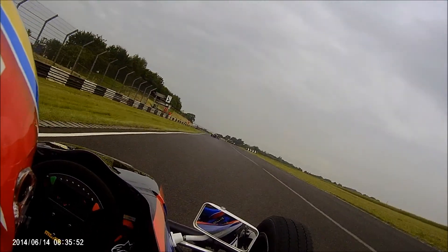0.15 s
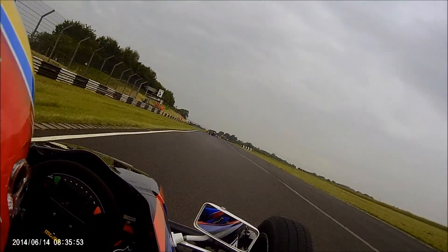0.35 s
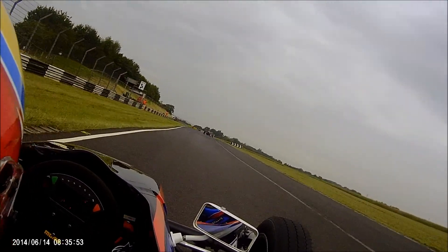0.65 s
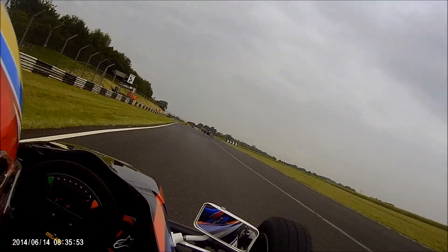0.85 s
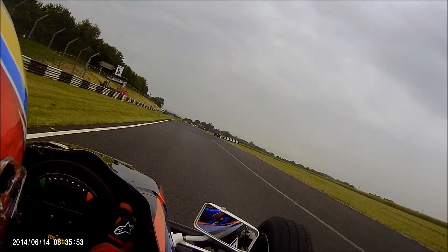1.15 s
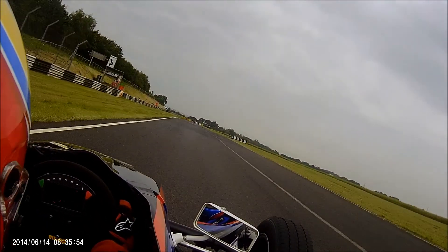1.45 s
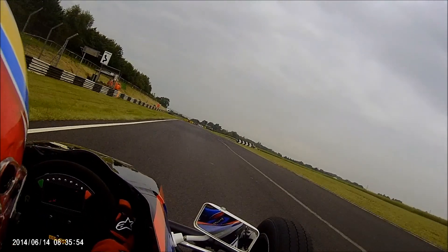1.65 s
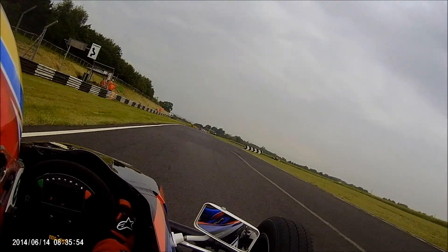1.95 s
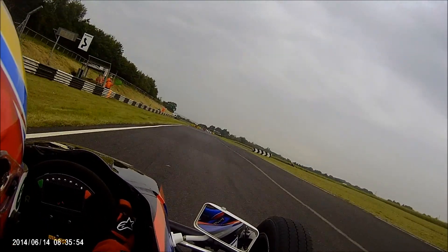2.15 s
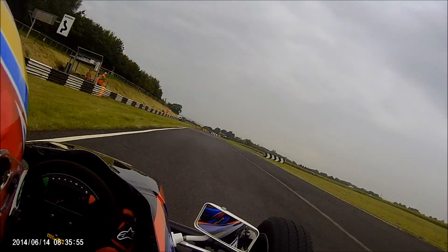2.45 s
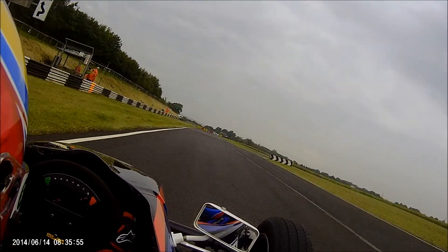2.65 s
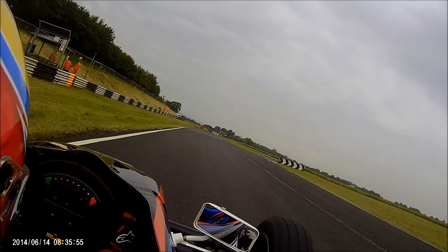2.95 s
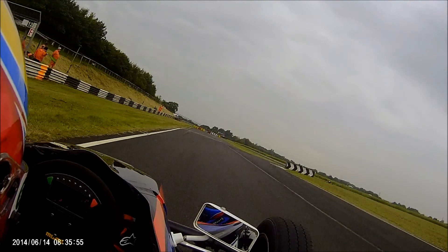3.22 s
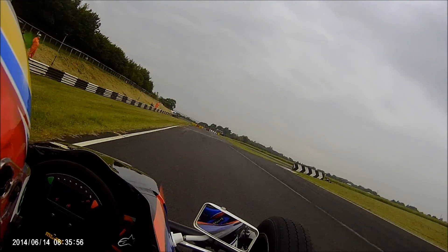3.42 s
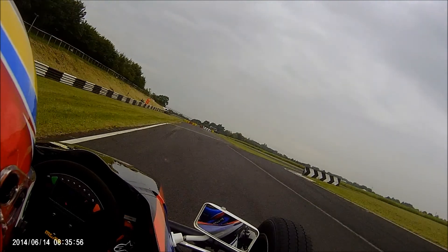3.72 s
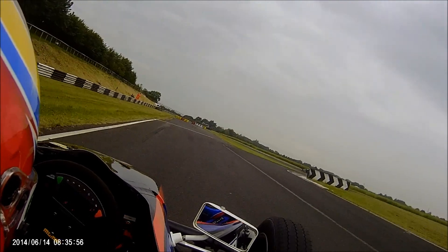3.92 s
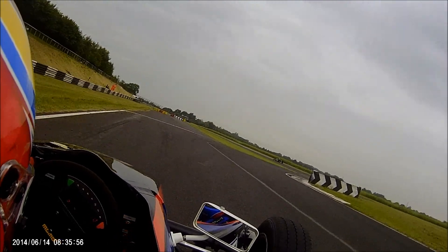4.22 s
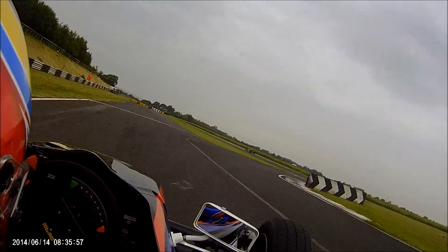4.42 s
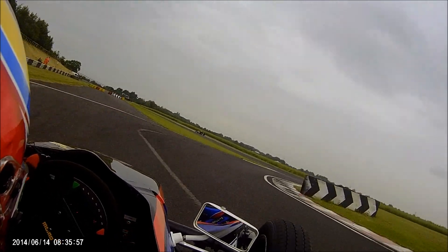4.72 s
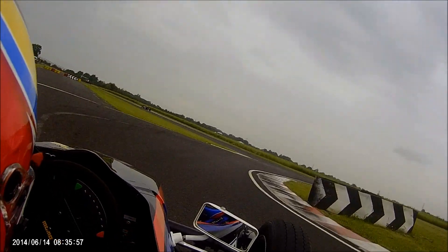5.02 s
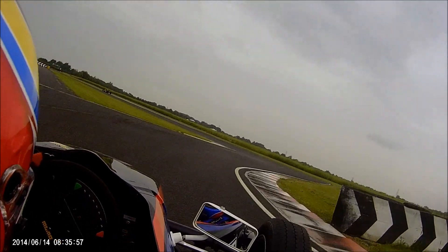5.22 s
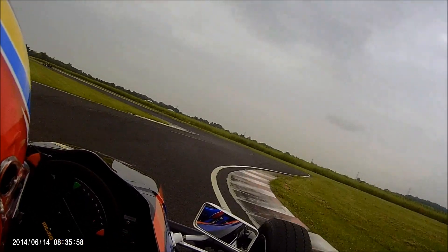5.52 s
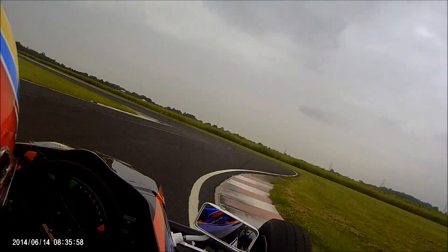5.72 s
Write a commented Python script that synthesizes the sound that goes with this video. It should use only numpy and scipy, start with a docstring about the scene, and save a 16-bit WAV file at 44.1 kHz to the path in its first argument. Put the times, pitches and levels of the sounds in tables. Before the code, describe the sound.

A small race car's air-cooled engine drones and clatters close by, its revs sinking steadily into a corner, then just starting to rise.

```python
"""An air-cooled four-cylinder engine on board a small open-wheel race car, close by the driver's helmet.
The revs sink on the way into a corner and just begin to pick up at the apex.
Engine orders are sine waves that swell and fade as they slide through the resonances of the bodywork.
Each firing thumps the frame and makes a loose part tick, both as filtered impulses.
Filtered noise makes the rattle, the metallic clatter, the rush of air and tyres and the road rumble."""
import sys
import numpy as np
from scipy import signal
from scipy.fft import rfft, irfft
from scipy.io import wavfile
from scipy.ndimage import uniform_filter1d, minimum_filter1d

SR = 44100
rng = np.random.default_rng(int(sys.argv[2]) if len(sys.argv) > 2 else 0)


def wrap_up_sound(samples):
    """Save the sound to the file named by the first command line argument, as 16-bit audio."""
    columns = np.atleast_2d(samples).T
    # keep every value between -1 and 1, then stretch to whole-number steps
    tamed = np.clip(columns, -1, 1)
    steps = np.round(tamed * 32767).astype(np.int16)
    wavfile.write(sys.argv[1], SR, steps)


N = 258867
T = np.arange(N) / SR
BINS = np.fft.rfftfreq(N, 1 / SR)


def amp(db):
    """Decibels to gain."""
    return 10 ** (np.asarray(db) / 20)


def unit(x):
    """Scales to rms 1."""
    return x / np.sqrt(np.mean(x ** 2) + 1e-20)


def near(x, centre, width):
    """Bell curve: 1 at the centre, falling to 0 on either side."""
    return np.exp(-((x - centre) / width) ** 2)


def curve(rows):
    """A table of (seconds, value) as a curve over time."""
    seconds, values = np.transpose(rows)
    return np.interp(T, seconds, values)


def wander(per_s):
    """Random motion of rms 1, with per_s new random points a second joined by straight lines."""
    points = rng.standard_normal(2000)
    return unit(np.interp(T * per_s, np.arange(2000), points))


def response(colour, peaks=()):
    """Gain at every bin: a broad colour with resonant peaks on top, summed in dB."""
    hz, db = np.transpose(colour)
    total_db = np.interp(np.log(BINS + 1), np.log(hz), db)
    for centre, width, lift_db in peaks:
        total_db = total_db + lift_db / (1 + (2 * (BINS - centre) / width) ** 2)
    return amp(total_db)


def ring(x, gain):
    """Minimum-phase filter with the given gains: sound rings after its cause."""
    both_sides = np.r_[gain, gain[:0:-1]][:N]
    phase = -signal.hilbert(np.log(both_sides + 1e-6)).imag
    return irfft(rfft(x) * gain * np.exp(1j * phase[:len(gain)]), N)


def crossings(turns):
    """Samples at which a rotation passes a whole number, and that number."""
    at = np.flatnonzero(np.diff(np.floor(turns)) > 0) + 1
    return at, np.floor(turns[at]).astype(int)


def clicks(at, sizes, jitter_s):
    """Impulses of the given sizes, each a little early or late."""
    slip = rng.standard_normal(len(at)) * jitter_s * SR
    moved = np.clip(at + np.round(slip).astype(int), 0, N - 1)
    return np.bincount(moved, sizes, N)


# Revs at which every layer has its middle level, and how far from there the levels flatten out.
MID_RPM, FLATTEN_RPM = 3466, 370


def level(law, rpm):
    """Gain of a layer: it follows the revs, less and less steeply away from mid revs."""
    mid_db, db_per_krpm = law[:2]
    krpm = FLATTEN_RPM * np.tanh((rpm - MID_RPM) / FLATTEN_RPM) / 1000
    return amp(mid_db + db_per_krpm * krpm)


# Resonances that single engine orders sweep through as the revs change. Each row: multiple of the
# cycle rate, centre in Hz, width in Hz, rms level at the centre in dB.
ORDER_RESONANCES = [(3, 79.5, 6.8, -34), (4, 132.4, 18.4, -23.5), (8, 240.3, 22, -26), (8, 272, 36, -26.5),
                    (11, 296, 42, -34.5), (21, 620, 35.4, -13), (21, 729, 24, -12)]


def drones(cycle, rpm, shudder, flutter=0.15, sway_rad=0.096, skirt=3):
    """The firing note, its octave and a few odd orders swell as the revs carry them through a resonance."""
    cycle_hz = rpm / 120
    swell = {}
    for order, hz, width, db in ORDER_RESONANCES:
        k = round(order)
        detune = 2 * (k * cycle_hz - hz) / width
        resonance = amp(db) / (1 + detune ** 2 / skirt) ** (skirt / 2)
        swell[k] = swell.get(k, 0) + resonance
    out = np.zeros(N)
    for k, gain in swell.items():
        throb = shudder if k > 20 else 1  # of the drones, only the highest shudders
        unsteady = 1 + flutter * wander(35)
        phase = 2 * np.pi * k * cycle + sway_rad * wander(21)
        out += gain * throb * unsteady * np.sin(phase)
    return np.sqrt(2) * out


# What the frame rings with under a thump. Each row: frequency in Hz, relative gain in dB.
FRAME = [(20, -47), (430, -25), (520, -14.5), (600, -1.5), (760, -0.5), (840, -3.5), (930, -33.5),
         (1120, -13.5), (1400, -35), (9000, -105)]
# Each cylinder knocks hardest at its own revs, in firing order.
# Each row: revs in rpm, width in rpm, lift in dB.
CYLINDERS = [(3820, 57, 17.5), (4290, 140, 8), (3345, 240, 16.5), (3730, 200, 5.5)]
# Peak of a thump without lift, by revs. In order: dB at mid revs, dB per 1000 rpm more, an unused value.
THUMP_LAW = (-21, -1.1, 0)


def thumps(cycle, rpm, lag=0.1217, uneven_db=0.3, jitter_s=.0001):
    """Four firings a cycle, of unequal strength, each setting the frame ringing for a few milliseconds."""
    at, firing = crossings(4 * (cycle - lag))  # lag in cycles
    centre, width, lift_db = np.array(CYLINDERS)[firing % len(CYLINDERS)].T
    db = lift_db * near(rpm[at], centre, width) + uneven_db * rng.standard_normal(len(at))
    frame = response(FRAME)
    unit_peak = abs(ring(signal.unit_impulse(N), frame)).max()
    return level(THUMP_LAW, rpm) * ring(clicks(at, amp(db), jitter_s), frame) / unit_peak


# Broad response of the bodywork. Each row: frequency in Hz, gain in dB.
BODY = [(20, -28.5), (60, -20), (100, -26.5), (150, -3), (235, -5), (300, -1.5), (390, -18.5), (490, -4.5),
        (580, 5.5), (810, 5), (900, 2), (1200, 4.5), (1330, -9), (1800, -10), (6000, -65.5)]
# Panels and cavities that ring on top of it. Each row: centre in Hz, width in Hz, lift in dB.
PANELS = [(83, 5.3, 14), (625, 46, 7.5), (741, 61, 10), (1092.5, 52, 10)]
# Orders set apart from the even buzz. Each row: multiple of the cycle rate, gain in dB.
STRONG_ORDERS = [(2, 10.5), (6, -2.5), (9, 0), (17, 6.5), (19, 5), (23, 6.5), (25, 4.5), (31, 4)]
# Gain of the buzz by revs. In order: dB at mid revs, dB per 1000 rpm more, an unused value.
BUZZ_LAW = (-39.5, 14.5, 0)


def buzz(cycle, rpm, flutter=0.083, sway_rad=0.55):
    """The other orders of the cycle, 2 to 55, swell and fade as they slide through the body's resonances."""
    cycle_hz = rpm / 120
    body = response(BODY, PANELS)
    order_db = {round(order): db for order, db in STRONG_ORDERS}
    droning = {round(row[0]) for row in ORDER_RESONANCES}
    out = np.zeros(N)
    for order in range(2, 56):
        if order in droning:
            continue
        bins = (order * cycle_hz * N / SR).astype(int)
        gain = body[bins] * amp(order_db.get(order, -2))
        phase = 2 * np.pi * (order * cycle + rng.random()) + sway_rad * wander(12)
        out += gain * (1 + flutter * wander(14)) * np.sin(phase)
    return level(BUZZ_LAW, rpm) * out


# Level of the rattle by revs. In order: dB at mid revs, dB per 1000 rpm more, an unused value.
RATTLE_LAW = (-20, 8.4, 0)


def rattle(cycle, rpm, throb=0.64, gust_db=-0.23):
    """The irregular part of the shaking: puffs of noise at the firing rate ring the same bodywork."""
    puffs = 1 + throb * np.cos(8 * np.pi * (cycle - 1 / 8))
    drive = puffs * rng.standard_normal(N) * amp(gust_db * wander(18))
    return level(RATTLE_LAW, rpm) * unit(ring(drive, response(BODY, PANELS)))


# Broad colour of the clatter. Each row: frequency in Hz, relative gain in dB.
CLATTER_COLOUR = [(900, -6), (1400, -5), (1860, 3), (2000, -7.5), (2250, -3), (2360, -14.5), (2750, -5),
                  (2950, -15), (3350, -11.5), (3650, -27), (5000, -26), (7200, -44), (11000, -52.5),
                  (16000, -63)]
# Ringing metal parts. Each row: centre in Hz, width in Hz, lift in dB.
METAL = [(2485, 53, 10.5), (3997, 140, 9), (4240, 130, -3), (4517, 220, 6.5), (5870, 240, 18),
         (6700, 160, 11.5)]
# Level of the clatter by revs. In order: dB at mid revs, dB per 1000 rpm more, an unused value.
CLATTER_LAW = (-28, 11.7, 1)


def clatter(cycle, rpm, bite=0.91, fade=0.27, uneven_db=0.7, lope=0.14):
    """Valve gear: a burst of noise at every firing rings metal parts, more on one side of the cycle."""
    since = (4 * cycle - 1 / 8) % 1  # since the last burst, in firing intervals, as is fade
    bursts = 1 + bite * np.exp(-since / fade)
    loping = 1 + lope * np.cos(2 * np.pi * (cycle - 1 / 3))
    drive = bursts * loping * rng.standard_normal(N) * amp(uneven_db * wander(60))
    return level(CLATTER_LAW, rpm) * unit(ring(drive, response(CLATTER_COLOUR, METAL)))


# Colour of the loose part's tick. Each row: frequency in Hz, gain in dB.
TICK_COLOUR = [(1000, -6), (2500, 6.5), (3700, 2), (5000, 14), (7000, -3), (9200, 1.5), (10500, -10.5),
               (12000, -13.5), (16000, -16)]
# Relative strength of the tick in dB, for each of the four firings in turn.
TICK_PATTERN = [1, 2, -3, 1]
# The sharpest single ticks. Each row: start in seconds, strike level before colouring in dB.
SNAPS = [(.0672, -21), (.4643, -27), (.6555, -26), (1.275, -26), (2.6294, -31), (4.4752, -32),
         (4.9916, -33)]
# Level of the regular ticks by revs. In order: dB at mid revs, dB per 1000 rpm more, an unused value.
TICK_LAW = (-54, 19, 5)


def ticks(cycle, rpm, lag=.045, uneven_db=3.2, jitter_s=.0003, contact_s=.0003):
    """A loose part hits its seat at each firing, now softly, now hard: short decaying bursts of noise."""
    at, firing = crossings(4 * (cycle - lag))  # lag in cycles
    chance = np.minimum(rng.standard_normal(len(at)), 1)  # capped on the loud side
    sizes = amp(np.take(TICK_PATTERN, firing, mode="wrap") + uneven_db * chance)
    contact = np.exp(-T[:SR // 100] / contact_s)
    grit = rng.choice([-1, 1], N)  # random signs turn each smooth contact into noise
    colour = response(TICK_COLOUR)
    regular = signal.oaconvolve(clicks(at, sizes, jitter_s), contact)[:N]
    seconds, strike_db = np.transpose(SNAPS)
    strikes = np.bincount((seconds * SR).astype(int), amp(strike_db), N)
    snaps = signal.oaconvolve(strikes, contact)[:N]
    return level(TICK_LAW, rpm) * unit(ring(regular * grit, colour)) + ring(snaps * grit, colour)


# Colour of air and tyres. Each row: frequency in Hz, relative gain in dB.
RUSH_COLOUR = [(20, -16), (60, -13.5), (95, -12), (170, 2.5), (450, 1), (900, -5), (1400, -1.5),
               (2200, -15.5), (4000, -32), (12000, -53)]
# Level of the rush by revs. In order: dB at mid revs, dB per 1000 rpm more, an unused value.
RUSH_LAW = (-31.5, 24.4, 6)


def rush(rpm, gust_db=2.76):
    """Air and tyres: gusting noise that roars less as the revs sink with the car's speed."""
    roar = unit(ring(rng.standard_normal(N), response(RUSH_COLOUR)))
    return level(RUSH_LAW, rpm) * amp(gust_db * wander(16)) * roar


# Road rumble through the suspension. Each row: time in seconds, level in dB.
RUMBLE = [(0, -33.5), (2.2, -34.5), (2.9, -30), (4.8, -30), (5.87, -29)]
# Its broad colour. Each row: frequency in Hz, relative gain in dB.
RUMBLE_COLOUR = [(20, -12.5), (45, -10.5), (65, 3), (105, -21), (170, -1.5), (240, 3.5), (300, -6),
                 (380, -20.5), (1500, -72.5)]
# The chassis ringing on top. Each row: centre in Hz, width in Hz, lift in dB.
CHASSIS = [(80.6, 3.9, 18)]


def rumble(bump_db=0.8):
    """Rough asphalt, as noise of uneven strength, shakes the chassis, more strongly later on."""
    road = rng.standard_normal(N) * amp(bump_db * wander(19))
    return amp(curve(RUMBLE)) * unit(ring(road, response(RUMBLE_COLOUR, CHASSIS)))


# Crankshaft speed. Each row: time in seconds, speed in revolutions a minute.
RPM = [(0.0, 4224), (0.2, 4111), (0.4, 4104), (1.4, 3804), (2.3, 3592), (3.4, 3405), (4.2, 3234),
       (4.8, 3177), (5.4, 3172), (5.87, 3261)]
# The revs wobble quickly as they pass through this range.
WOBBLE_AT_RPM, WOBBLE_WIDTH_RPM, WOBBLE_RPM, WOBBLE_HZ = 3540, 150, 24, 7
# The level shudders once a cycle while the revs pass through this range.
SHUDDER_RPM, SHUDDER_WIDTH_RPM, SHUDDER_DEPTH = 3324, 105, 0.21
# The engine eases off for a moment early on.
LULL_S, LULL_WIDTH_S, LULL_DB = 0.215, 0.015, -4


def scene():
    """The engine's sounds follow the four-stroke cycle: two turns of the crankshaft."""
    rpm = curve(RPM)
    wobble = WOBBLE_RPM * near(rpm, WOBBLE_AT_RPM, WOBBLE_WIDTH_RPM) * np.sin(2 * np.pi * WOBBLE_HZ * T)
    cycle = np.cumsum((rpm + wobble) / 120) / SR  # cycles completed so far
    depth = SHUDDER_DEPTH * near(rpm, SHUDDER_RPM, SHUDDER_WIDTH_RPM)
    shudder = 1 + depth * np.cos(2 * np.pi * (cycle - 2 / 3))
    engine = drones(cycle, rpm, shudder) + thumps(cycle, rpm)
    engine = engine + shudder * (buzz(cycle, rpm) + rattle(cycle, rpm))
    lull = amp(LULL_DB * near(T, LULL_S, LULL_WIDTH_S))
    metal = clatter(cycle, rpm) + ticks(cycle, rpm)
    return (lull * engine + metal + rush(rpm) + rumble())[None]


EDGE_HZ = 15900  # upper band limit


def record(dry):
    """A fast limiter holds the peaks under full scale; then short end fades and the band limit."""
    headroom = np.minimum(1, .94 / (abs(dry) + 1e-9))
    held = minimum_filter1d(headroom, size=201)
    gain = uniform_filter1d(uniform_filter1d(held, size=101), size=101)
    faded = dry * gain * signal.windows.tukey(N, .001)
    lowpass = signal.firwin(511, EDGE_HZ, window=("kaiser", 9), fs=SR)
    return signal.oaconvolve(faded, lowpass[None], "same")


dry = scene()
out = record(dry)
wrap_up_sound(out)
```